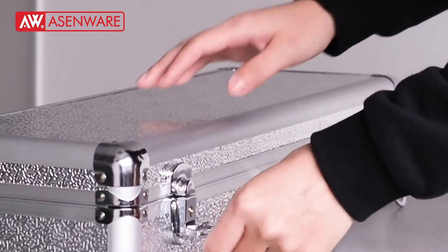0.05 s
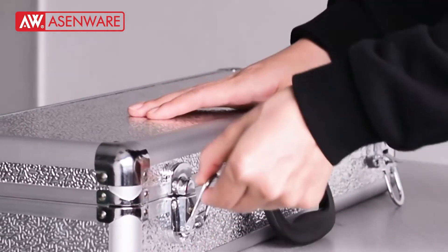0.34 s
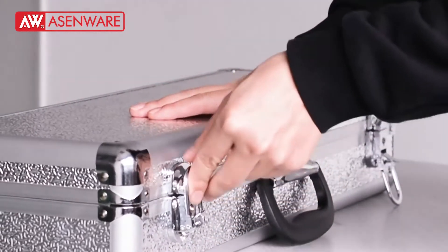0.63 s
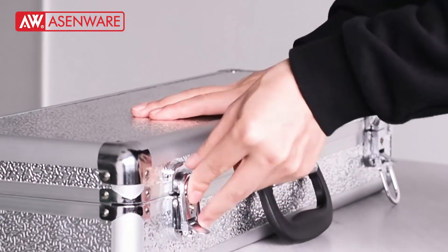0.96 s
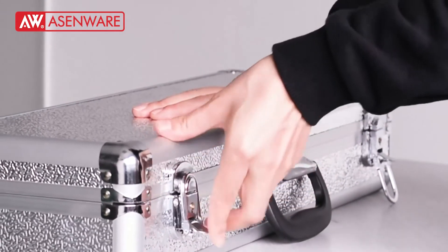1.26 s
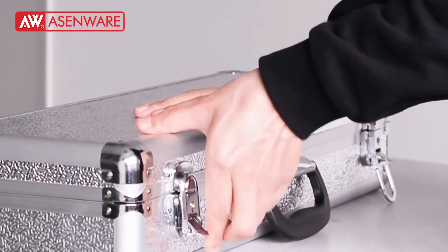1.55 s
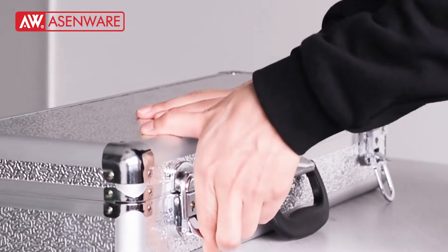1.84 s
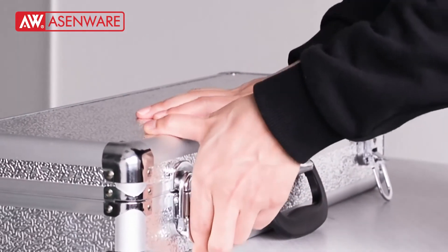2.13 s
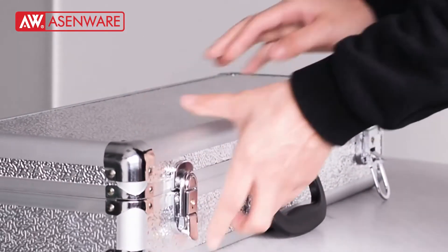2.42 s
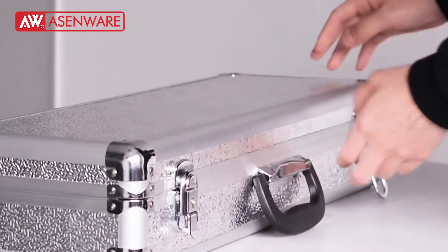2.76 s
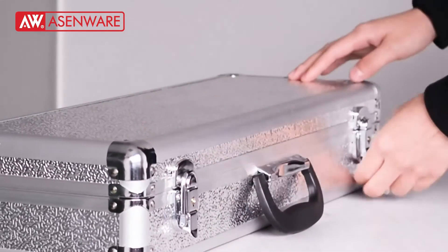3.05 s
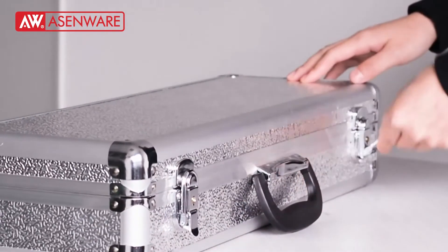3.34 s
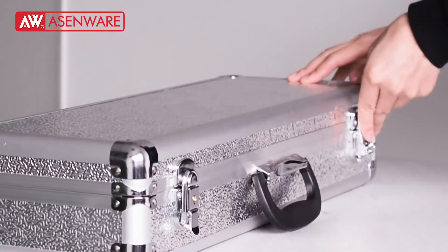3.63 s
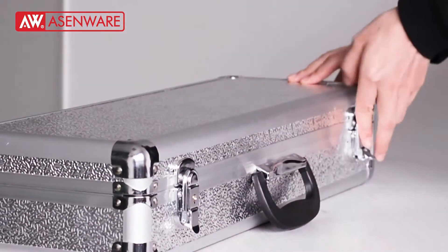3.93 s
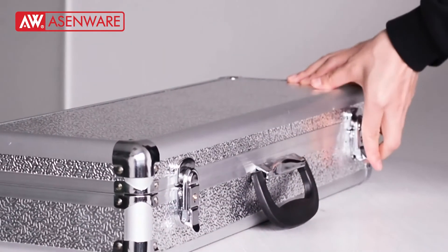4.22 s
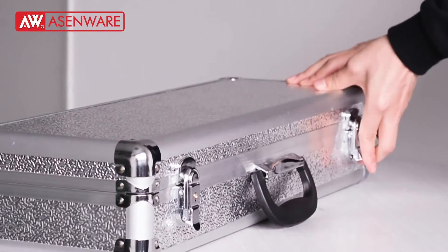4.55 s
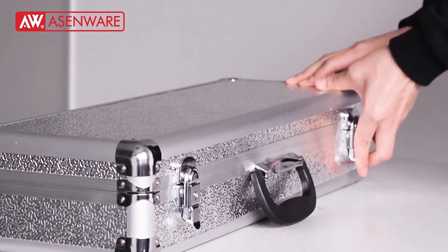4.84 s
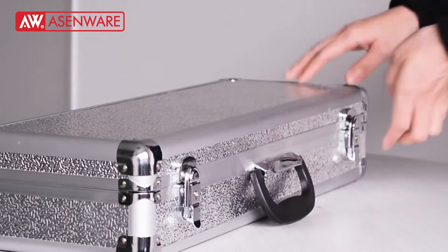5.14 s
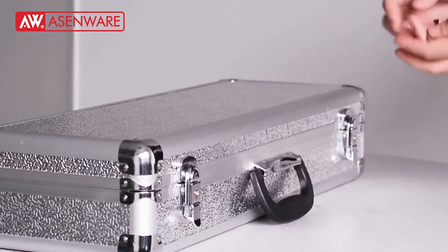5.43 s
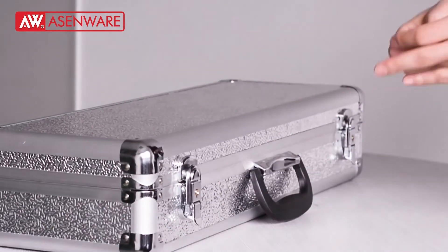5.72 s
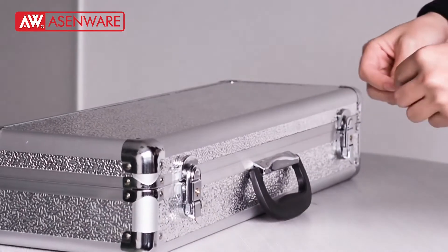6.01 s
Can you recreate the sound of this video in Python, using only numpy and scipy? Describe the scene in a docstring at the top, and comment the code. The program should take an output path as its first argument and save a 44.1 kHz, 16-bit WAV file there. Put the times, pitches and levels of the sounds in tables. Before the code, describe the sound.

In a bare room with a short echo and faint ventilation, light metal clicks and small creaks lead to the sharp snap of a latch closing on an aluminium case. Dull palm bumps follow, then more clicks and a short squeak from the second latch, which shuts with a louder, ringing snap. A brief rustle of sleeves and a soft knock finish it, all heard from nearby.

```python
"""Light metal clicks sound over a soft hiss of ventilation in a bare, echoing room.
Hands are closing the two steel latches of an aluminium case, the near one and then the far one.
Each wire loop rattles over its catch and creaks as it is pulled tight; then its lever snaps down
and shakes the case. The second lever squeaks first. Palms bump the lid with dull knocks, and
sleeves brush past as the hands draw back."""
import sys
import numpy as np
from scipy import signal
from scipy.fft import rfft, irfft, next_fast_len
from scipy.io import wavfile
from scipy.ndimage import uniform_filter1d, minimum_filter1d, map_coordinates

SR = 44100
rng = np.random.default_rng(int(sys.argv[2]) if len(sys.argv) > 2 else 0)


def unload_audio(sound):
    """Save the sound as a 16-bit wav file, at the path given as the first command line argument."""
    columns = np.transpose(np.atleast_2d(sound))
    # keep every value between -1 and 1, then stretch to whole-number steps
    steps = np.round(np.clip(columns, -1, 1) * 32767)
    wavfile.write(sys.argv[1], SR, steps.astype(np.int16))


N = 276890
CLOCK = np.arange(N) / SR  # seconds through the scene
T = np.arange(SR * 4 // 5) / SR  # seconds through one short sound
HZ = np.fft.rfftfreq(2 * len(T), 1 / SR)

# how the box, lid, frame and loose wire ring: pitch_hz, width_hz, level_db
BOX_RING = [(245, 70, -14.5), (384, 73, 3), (484, 170, 6.5)]
LID_RING = [(735, 120, -22), (845, 360, -19.5), (930, 760, -29)]
FRAME_RING = [(1238, 130, 0.98), (1490, 270, -2.9)]
WIRE_RING = [(3030, 330, 7), (3980, 244, 8), (7330, 680, -3), (9460, 4900, -13), (12360, 1100, -20)]
# the near and far lever snapping shut: start_s, level_db, cutoff_s (time until the boom dies away)
LEVER_SNAPS = [(1.9857, 17.5, 0.18), (4.7167, 27, 0.35)]


def amp(db):
    """Turn decibels into a gain."""
    return 10 ** (np.asarray(db) / 20)


def unit(x):
    """Scale to an average power of 1."""
    return x / np.sqrt(np.mean(x ** 2) + 1e-20)


def unit_energy(x):
    """Scale to an average energy of 1 per channel."""
    return unit(x) / np.sqrt(x.shape[-1])


def along(points, hz):
    """Read a curve of (pitch_hz, value) points at hz, on a log scale of pitch."""
    pitches, values = np.transpose(points)
    return np.interp(np.log(hz + 1), np.log(pitches + 1), values)


def wobble(rate):
    """A smooth random curve through rate points a second."""
    return map_coordinates(rng.standard_normal(int(N * rate / SR) + 4), [CLOCK * rate])


def humps(modes):
    """A gain curve with a hump at each pitch where a part rings."""
    return sum(amp(db) / (1 + (2 * (HZ - hz) / width) ** 2) for hz, width, db in modes)


def fine_modes(depth_db, spacing_hz):
    """A ragged gain curve: each point of contact wakes its own narrow resonances."""
    ripple = map_coordinates(rng.standard_normal(4096), [HZ / spacing_hz], mode="wrap")
    return amp(depth_db * ripple * HZ / (HZ + 1200))


def coloured(x, gain):
    """Shape the tone of x by a gain curve, ringing only after each hit."""
    cepstrum = irfft(np.log(np.maximum(gain / gain.max(), 1e-6)))
    cepstrum[1:len(T)] *= 2
    cepstrum[len(T) + 1:] = 0
    response = irfft(np.exp(rfft(cepstrum)))[:len(T) // 8]
    return signal.fftconvolve(x, response[None], axes=1)[:, :x.shape[1]]


def filtered(x, response):
    """Scale each frequency of x by response(hz), with no delay."""
    size = next_fast_len(x.shape[-1] + 4096)
    gain = response(np.fft.rfftfreq(size, 1 / SR))
    return irfft(rfft(x, size) * gain, size)[..., :x.shape[-1]]


def diffuse(size, width=None):
    """Stereo noise, by default alike in both ears except in the treble."""
    # stereo spread of the room: pitch_hz, side_minus_mid_db
    room_width = [(100, -24), (1000, -27), (2500, -21), (5000, -8), (9000, -6), (14000, -6)]
    width = room_width if width is None else width
    mid = rng.standard_normal(size)
    side = filtered(rng.standard_normal(size), lambda hz: amp(along(width, hz)))
    return unit(np.array([mid + side, mid - side]))


def add(out, s, sound):
    """Mix a sound in at s seconds."""
    start = round(s * SR)
    sound, start = sound[:, max(-start, 0):], max(start, 0)
    out[:, start:start + sound.shape[1]] += sound[:, :N - start]


def panned(x, pan_db):
    """Make the left ear pan_db louder than the right."""
    return x * amp([[pan_db / 2], [-pan_db / 2]])


def stroke(s, length, rise_db_per_s, fall_db_per_s):
    """Gain of one movement: it swells until s, holds for length seconds and fades."""
    before, after = np.maximum(s - CLOCK, 0), np.maximum(CLOCK - s - length, 0)
    return amp(-rise_db_per_s * before - fall_db_per_s * after)


def echo(direct_db, hold_s):
    """A click in the room: the direct sound, then echoes that hold briefly and die away."""
    # time for echoes to fall 60 dB: pitch_hz, fade_s
    room_fade = [(150, 0.76), (500, 0.66), (1000, 0.53), (2200, .66), (5000, 0.53), (8000, 0.49),
                 (13000, 0.32)]
    hz, t, bands = signal.stft(diffuse(len(T)), SR, nperseg=256)
    age = np.hypot(t, hold_s) - hold_s
    fade = amp(-60 * age / along(room_fade, hz)[:, None])
    tail = unit_energy(signal.istft(bands * fade, SR, nperseg=256)[1][:, :len(T)])
    tail[:, 0] += amp(direct_db)
    return unit_energy(tail)


def chatter(x, gap_s, bounce_db, count):
    """Steel bounces at uneven gaps, changing level by bounce_db each time."""
    out = x.copy()
    for k, s in enumerate(np.cumsum(gap_s * rng.uniform(.7, 1.3, count)), 1):
        out += amp(k * bounce_db) * np.pad(x, ((0, 0), (round(s * SR), 0)))[:, :x.shape[1]]
    return out


def crack(fade_s, rebound_db):
    """Steel hits steel: a short, bright burst with one bounce."""
    burst = diffuse(len(T)) * amp(-60 * T / fade_s)
    burst = chatter(burst, gap_s=0.0035, bounce_db=rebound_db, count=1)
    return unit_energy(coloured(burst, humps([(8100, 3000, -2), (10100, 1900, -0.5)])))


def touch(shaken, crack_db):
    """One contact shakes a list of (part, level_db); a hard one starts faster and cracks."""
    gain = np.sqrt(sum((amp(db) * unit(humps(part))) ** 2 for part, db in shaken))
    strength = np.sqrt(np.mean(gain ** 2))
    hardness = strength ** 2 / (strength ** 2 + 4)
    cutoff_s = .13 + hardness * .6  # a light tap's echo dies away sooner
    click = chatter(echo(direct_db=-27.5, hold_s=.016), gap_s=.005, bounce_db=-14.5, count=2)
    click *= 1 - np.exp(-(T + 0.00038) * hardness / 0.00035)
    click *= np.exp(-(T / cutoff_s) ** 4)
    steel = fine_modes(depth_db=4 - 1.5 * hardness, spacing_hz=190)
    ring = strength * unit_energy(coloured(click, gain * steel))
    return ring + hardness * amp(crack_db) * crack(fade_s=0.0055, rebound_db=-4)


def clicks():
    """A loop or lever taps its catch, ringing the steel and the shell of the case behind it."""
    # taps: start_s, which latch, steel_db, shell_db
    taps = [(-.06, "near", -16.5, -22.5), (.185, "near", -10.5, -23), (.556, "near", -9.5, -7),
            (0.7217, "near", 4, 2.5), (1.335, "near", -21, -23), (2.607, "near", -28.5, -20),
            (3.005, "far", -15.5, -5), (3.302, "far", -17.5, -6.5), (3.583, "far", 5, 4.5),
            (3.751, "far", -13.5, -3)]
    # each latch's share of a tap: (box_db, lid_db, frame_db), (plate_db, loop_db, edge_db)
    shares = {"near": ((-24, -1, 3.5), (3.5, 0.5, 0)), "far": ((-12, 0, -0.06), (1.5, 0.0068, -0.6))}
    # how the latch plate, each taut loop and the steel edge ring: pitch_hz, width_hz, level_db
    plate = [(1877, 290, 1.5), (2340, 620, -0.5)]
    loops = {"near": [(2895, 530, 5), (3666, 480, -1), (4510, 600, -1)], "far": [(2750, 600, 4),
             (3420, 580, 2), (4140, 600, -11.5)]}
    edge = [(4610, 1800, 1), (6650, 2800, 1.5), (8400, 1200, -1), (10400, 2800, 3), (12800, 760, -6)]
    out = np.zeros((2, N))
    for s, latch, steel_db, shell_db in taps:
        shell, steel = shares[latch]
        shaken = [(part, shell_db + db) for part, db in zip((BOX_RING, LID_RING, FRAME_RING), shell)]
        shaken += [(part, steel_db + db) for part, db in zip((plate, loops[latch], edge), steel)]
        shaken += [(WIRE_RING, -10 + 0.47 * steel_db)]  # loose wire rings even at a light touch
        add(out, s, touch(shaken, crack_db=steel_db - 5))
    return out


def ventilation():
    """Moving air makes a dull hiss and a faint hum; the background stays slightly raised for a moment after
    each snap."""
    # tone of the air: pitch_hz, level_db
    air_tone = [(15, -48), (25, -30.5), (54, -9.5), (101, -8.5), (271, -9.5), (318, -0.5), (354, -13.5),
                (383, -5), (879, -5.5), (1000, -2), (2070, -14.5), (2430, -14), (2850, -24), (10900, -37),
                (15000, -68.5)]
    # its stereo spread: pitch_hz, side_minus_mid_db
    air_width = [(50, -14), (500, -22.5), (3000, -6.5), (10000, -12)]
    linger = sum((CLOCK > s) * np.exp(-np.abs(CLOCK - s) / 0.31) for s, *_ in LEVER_SNAPS)
    air_db = -49 + 6.5 * linger + 0.26 * wobble(7)
    air = unit(coloured(diffuse(N, air_width), amp(along(air_tone, HZ))))
    hum = unit(coloured(diffuse(N, air_width), humps([(64, 9.2, 0)])))
    return amp(air_db) * air + amp(-65) * hum


def palm_bumps():
    """A soft palm on the lid shakes mostly the box: a dull, hollow knock."""
    # knocks: start_s, level_db
    knocks = [(0.591, -4.5), (2.612, -6.5), (2.68, -10.5), (3.029, -7.5), (5.876, -9.5)]
    out = np.zeros((2, N))
    for s, db in knocks:
        add(out, s, touch([(BOX_RING, db), (LID_RING, db - 17), (FRAME_RING, db - 24)], crack_db=db - 30))
    return out


def creaks():
    """The tightening latch rubs on the case, each rub ringing around one pitch."""
    # rubs: start_s, length_s, pitch_hz, level_db
    rubs = [(0.887, 0.036, 2080, -43), (0.971, 0.019, 768, -47), (1.1, 0.037, 757, -45.5),
            (1.16, 0.17, 773, -51), (1.45, 0.065, 2940, -56), (3.74, 0.14, 3030, -48),
            (4.176, 0.022, 2050, -42.5)]
    out = np.zeros((2, N))
    for s, length, hz, db in rubs:
        rub = unit(coloured(diffuse(N), humps([(hz, 0.13 * hz, 0)])))
        out += amp(db) * stroke(s, length, rise_db_per_s=353.5, fall_db_per_s=207) * rub
    return out


def loop_slides():
    """The wire loop drags lightly over its catch and rings."""
    # drags: start_s, length_s, level_db
    drags = [(1.461, 0.027, -55), (2.81, 0.055, -68.5), (3.24, 0.053, -63), (3.32, .06, -54.5)]
    drag = sum(amp(db) * stroke(s, length, rise_db_per_s=150, fall_db_per_s=175)
               for s, length, db in drags)
    return drag * amp(3.5 * wobble(63)) * unit(coloured(diffuse(N), humps(WIRE_RING)))


def lever_snaps():
    """Each lever slams onto its plate; the heavy box booms a moment later."""
    # tone of the near and the far blow: pitch_hz, level_db
    near_tone = [(65, -64.5), (110, -32.5), (303, -15), (351, -3.5), (588, -14), (786, -7), (1320, -8.5),
                 (1590, -8.5), (1880, -10.5), (3350, -11), (7060, -22), (10900, -21), (12900, -32),
                 (14600, -47.5), (15500, -57)]
    far_tone = [(53, -80.5), (90, -44.5), (161, -18), (232, -17), (282, -13), (350, -17.5), (483, 3),
                (574, -7), (793, -2.5), (1270, -6.5), (1610, -7), (3740, -16.5), (10500, -23),
                (13600, -31.5), (15500, -48.5)]
    out = np.zeros((2, N))
    for (s, blow_db, cutoff_s), tone in zip(LEVER_SNAPS, (near_tone, far_tone)):
        click = chatter(echo(direct_db=-23, hold_s=0.016), gap_s=.004, bounce_db=-14, count=2)
        steel = fine_modes(depth_db=1.5, spacing_hz=130)
        blow = unit_energy(coloured(click, amp(along(tone, HZ)) * steel))
        bass = filtered(blow, lambda hz: 1 / (1 + (hz / 600) ** 4))
        boom = bass * (1 - np.exp(-T / .011)) * np.exp(-(T / cutoff_s) ** 4)
        snap = blow - bass + boom + amp(-16) * crack(fade_s=0.046, rebound_db=5.5)
        add(out, s, amp(blow_db) * snap)
    add(out, LEVER_SNAPS[1][0], amp(18) * case_ring(attack_s=0.036, fade_s=1.0, cutoff_s=.34))
    return out


def lever_squeak():
    """The lever's dry pivot slips: a short chirp with weak overtones over a scrape."""
    # slips: start_s, length_s, pitch_hz, chirp_db
    slips = [(3.9813, 0.0028, 2116, 3), (3.985, 0.015, 2107, 11.5)]
    pivot = humps([(2096, 1400, 1), (4280, 1100, -13.5), (5940, 3700, -20),
                   (7960, 970, -14), (8920, 7500, -9.5)])
    out = np.zeros((2, N))
    for s, length, hz, db in slips:
        t = T[:round(length * SR)]
        phase = 2 * np.pi * hz * t
        tone = np.sin(phase) + amp(-21) * np.sin(2 * phase) + amp(-36) * np.sin(4 * phase)
        chirp = tone * np.sin(np.pi * t / length) * np.exp(-t / length)
        walls = echo(direct_db=-1, hold_s=.005) * np.exp(-(T / .35) ** 4)
        heard = signal.fftconvolve(walls, chirp[None], axes=1)[:, :len(T)]
        scrape = coloured(echo(direct_db=-16, hold_s=0.0071), pivot)
        add(out, s, amp(db) * unit_energy(heard) + amp(-2) * unit_energy(scrape))
    return out


def case_ring(attack_s, fade_s, cutoff_s):
    """With both latches tight, the shell rings as one piece, then dies away quickly."""
    # notes of the closed case: pitch_hz, level_db
    notes = [(277, -16), (297, -13), (433, -5), (472, 0), (506, -4), (532, -7), (572, -8), (604, -7),
             (625, -6), (703, -8), (777, -8), (822, -5), (885, -7), (926, -9), (1072, -8), (1141, -10),
             (1373, -10), (1452, -10), (1543, -9), (1617, -8), (1663, -10), (1863, -11)]
    hz, db = np.transpose(notes)[:, :, None]
    strength_db = db + rng.normal(0, 1, hz.shape)
    phase = rng.uniform(0, 2 * np.pi, hz.shape)
    tones = amp(strength_db - 60 * T / fade_s) * np.sin(2 * np.pi * hz * T + phase)
    ending = np.exp(-(T / cutoff_s) ** 6)
    return unit_energy(tones.sum(0) * (1 - np.exp(-T / attack_s)) * ending)[None]


def sleeves():
    """Sleeves brush the case in uneven strokes, and the lid murmurs under them."""
    # strokes: start_s, length_s, sleeve_db, lid_db
    brushes = [(5.719, 0.047, -45.5, -68), (5.839, 0.1, -43.5, -40.5), (6.044, 0.14, -53, -48.5)]
    # tone of the brushing cloth: pitch_hz, width_hz, level_db
    cloth_tone = [(1410, 230, 1), (1945, 380, 7.5), (3090, 1500, 3.5), (5970, 3100, -11), (8400, 3100, -19)]
    strokes = np.array([stroke(s, length, rise_db_per_s=326, fall_db_per_s=122)
                        for s, length, *_ in brushes])
    cloth_gain, lid_gain = amp(np.transpose(brushes)[2:]) @ strokes
    brush = unit(coloured(diffuse(N), humps(cloth_tone)))
    dull = filtered(brush, lambda hz: 1 / (1 + (hz / 4500) ** 4))
    # faster strokes are brighter as well as louder
    brush = dull + (brush - dull) * amp(3.5) * (cloth_gain / cloth_gain.max()) ** 1.2
    murmur = unit(coloured(diffuse(N), humps([(514, 170, 1.5), (733, 150, -1.5), (1380, 930, -2.5)])))
    return cloth_gain * amp(0.57 * wobble(70)) * brush + lid_gain * murmur


def suppressor(x, depth_db):
    """Turn down quiet bands of pitch, so the echoes end early."""
    # what counts as quiet: pitch_hz, threshold_db
    quiet = [(100, -55.5), (350, -54.5), (550, -54.5), (1200, -52), (2500, -63.5), (5000, -78),
             (13000, -75)]
    hz, _, bands = signal.stft(x, SR, nperseg=512)
    power = np.mean(np.abs(bands) ** 2, 0)
    power = np.abs(uniform_filter1d(uniform_filter1d(power, size=2, axis=0), size=5, axis=1))
    shut = 1 / (1 + power / amp(along(quiet, hz))[:, None] ** 2)
    return signal.istft(bands * amp(-depth_db * shut), SR, nperseg=512)[1][:, :N]


def limiter(x, top):
    """Dip the level for an instant at any peak above top."""
    needed = np.minimum(1, top / (np.abs(x).max(0) + 1e-9))
    return x * uniform_filter1d(minimum_filter1d(needed, size=131), size=131)


def scene():
    """Mix latches, hands and air a little to the right, the hands further so."""
    # balance between the ears: pitch_hz, left_minus_right_db
    balance = [(100, -2.5), (2500, -2.5), (5000, -1.5), (9000, -.2), (14000, -1.4)]
    latches = clicks() + lever_snaps() + lever_squeak() + loop_slides() + panned(creaks(), pan_db=-2.5)
    hands = panned(palm_bumps() + sleeves(), pan_db=-2.5)
    mix = latches + hands + panned(ventilation(), pan_db=-0.7)
    return filtered(mix, lambda hz: amp(np.outer([.5, -.5], along(balance, hz))))


def record(dry):
    """The recorder turns down noise, holds back peaks and cuts the highest treble."""
    held = limiter(suppressor(dry, depth_db=9.5), top=1)
    return filtered(held, lambda hz: 1 / (1 + (hz / 15750) ** 200))


dry = scene()
out = record(dry)
unload_audio(out)
```